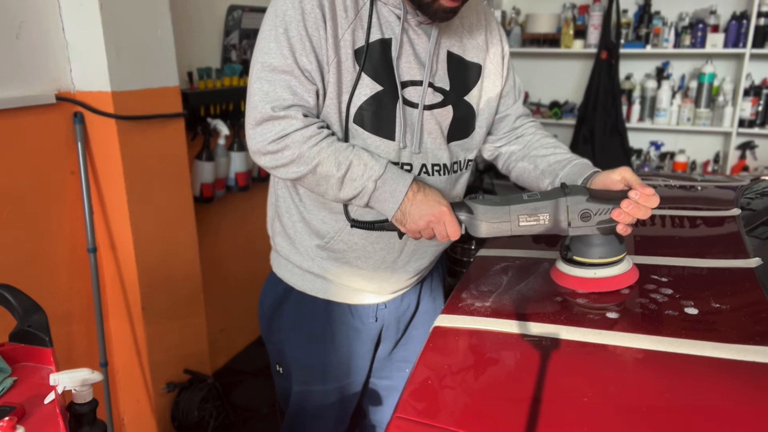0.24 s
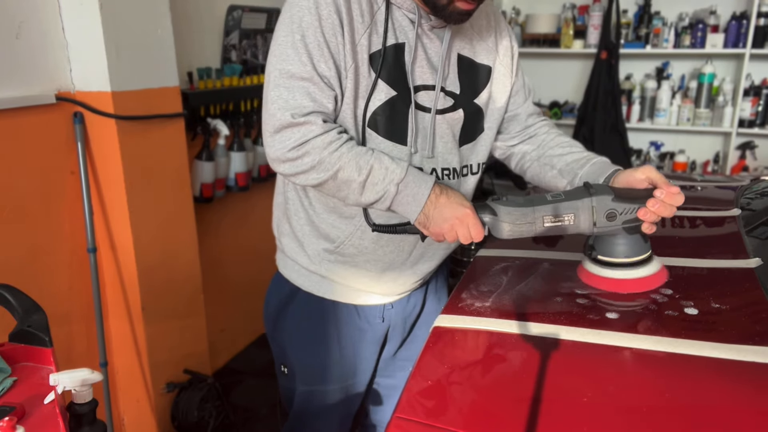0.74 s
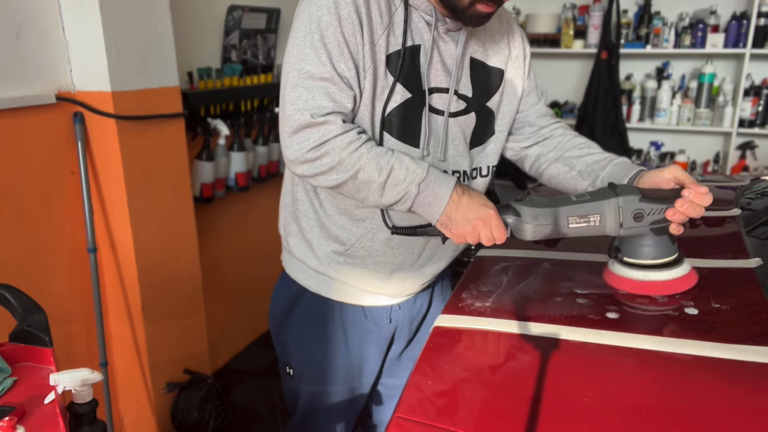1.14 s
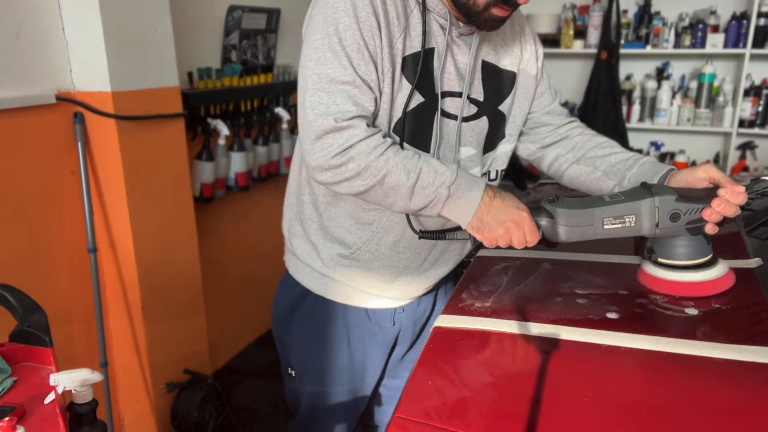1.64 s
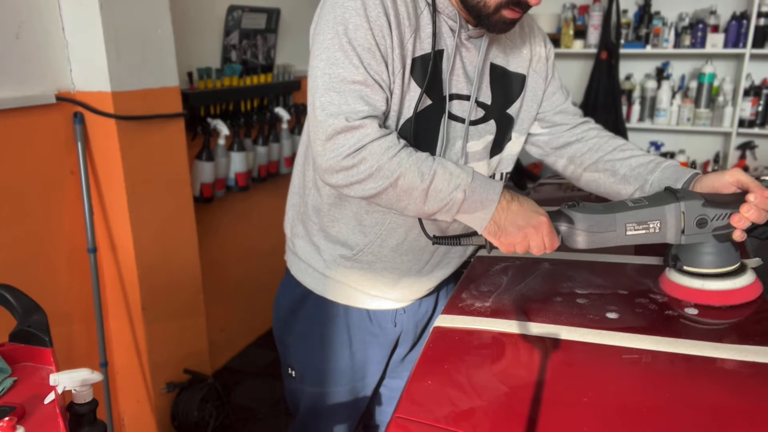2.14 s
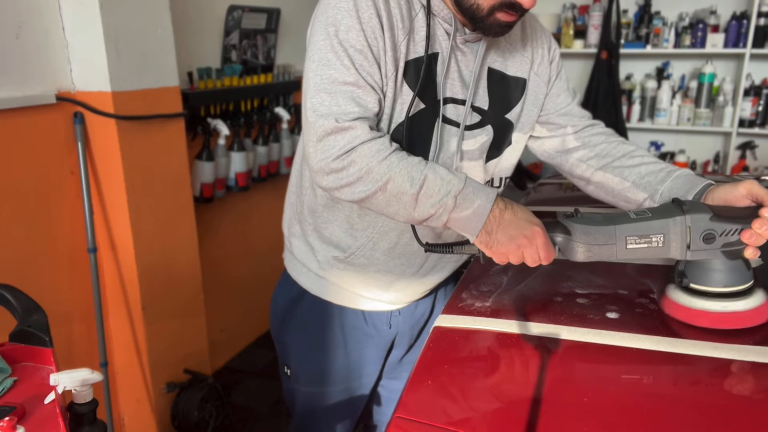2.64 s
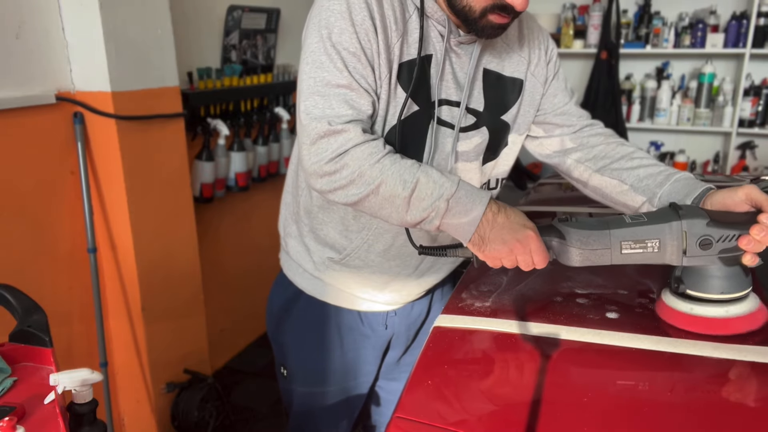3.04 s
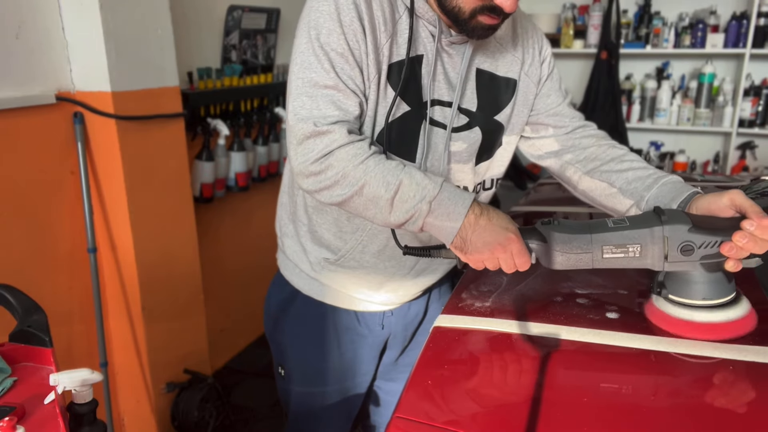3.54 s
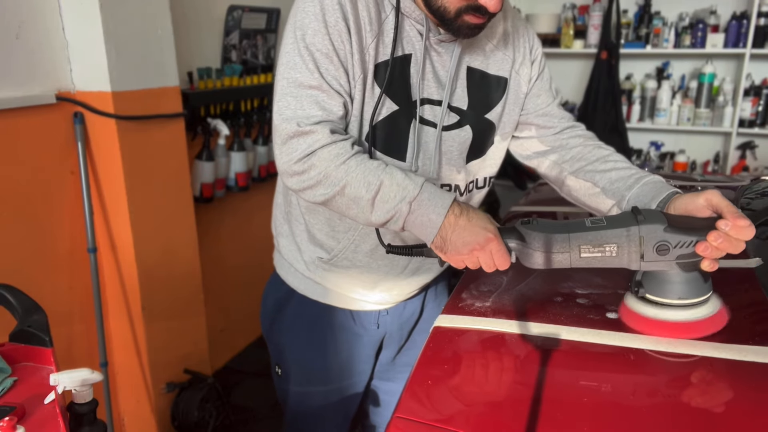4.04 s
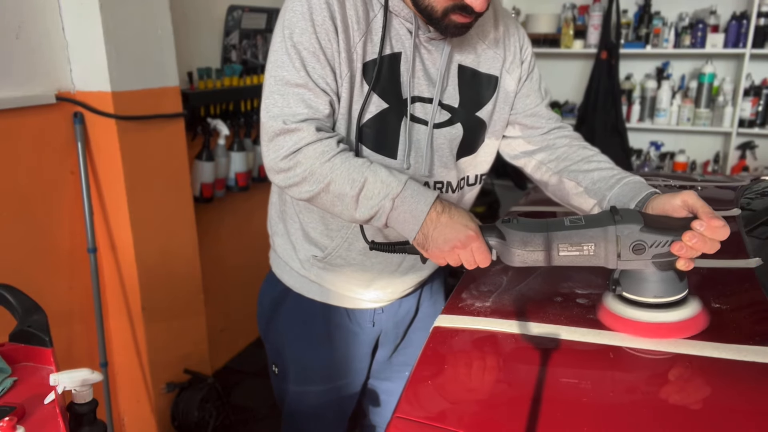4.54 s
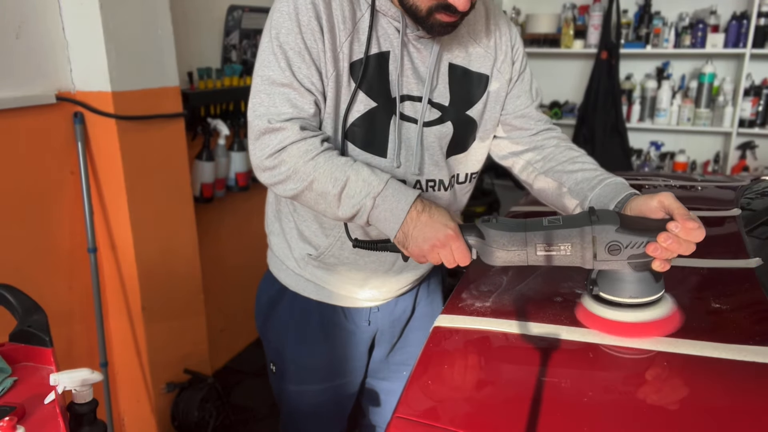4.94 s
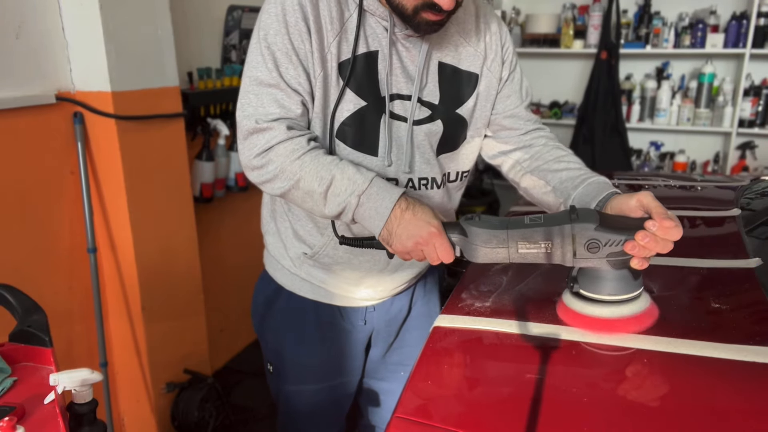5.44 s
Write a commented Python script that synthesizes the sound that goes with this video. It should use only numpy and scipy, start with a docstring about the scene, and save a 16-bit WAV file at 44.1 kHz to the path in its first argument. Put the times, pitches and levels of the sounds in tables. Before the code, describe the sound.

In a small workshop, close to a stereo microphone, an electric polisher sits almost silent, then starts with a surging hum, thumps and gear clatter. It settles into a coarse, buzzing rattle with foam scuffing over painted metal, then rises through four quicker steps, gaining hiss and whine, and is speeding up again as it ends.

```python
"""Polishing a car bonnet

In a small workshop, a dual-action polisher works close to a microphone with two ports, left and right.
Its motor hums with the mains pulses, starts, and climbs through four further speed steps.
Pulses of current knock the gears a hundred times a second, the orbiting pad shakes and scuffs the panel,
the commutator whines and air hisses from the vents; a short room tail surrounds it all."""
import sys
import numpy as np
from scipy import signal
from scipy.fft import rfft, irfft, next_fast_len
from scipy.io import wavfile
from scipy.ndimage import uniform_filter1d, map_coordinates

SR = 44100
rng = np.random.default_rng(int(sys.argv[2]) if len(sys.argv) > 2 else 0)


def log_audio(samples):
    """Write samples as a 16-bit WAV file to the path given in sys.argv[1]."""
    # one column per channel
    frames = np.atleast_2d(samples).T
    # limit to full scale, then quantise
    limited = np.clip(frames, -1, 1)
    pcm = np.round(limited * 32767).astype(np.int16)
    wavfile.write(sys.argv[1], SR, pcm)


N = 250929

PULSE_HZ = 100  # current pulses from the mains
GEAR_RATIO = 4.1  # rotor turns in one orbit of the pad
BARS = 24  # copper bars on the commutator
EDGE_HZ = 15500  # upper limit of the recorder
REFERENCE_SPEED = 100  # rotor turns per second
OVERSHOOT_AT_S, OVERSHOOT_S, OVERSHOOT_SHARE = 0.75, 0.18, 0.2  # centre, half length, share of the speed

# glides of the motor to each dial setting: (start [s], glide [s], rotor speed [turns/s])
DIAL = [(0.22, 0.48, 65.2), (2.19, 0.35, 83.9), (2.9, 0.37, 104.2), (3.97, 0.38, 124.3), (5.39, 0.5, 149)]
# resonances of the motor shell: (frequency [Hz], width [Hz], level [dB])
SHELL = [(3120, 250, -14), (3700, 260, -3), (5550, 600, -1), (6100, 400, 1), (6650, 600, 2)]


def dial_speed():
    """The speed asked of the motor, in turns per second: an eased glide to each setting."""
    t, speed = np.arange(N) / SR, np.zeros(N)
    for start, glide, setting in DIAL:
        progress = np.clip((t - start) / glide, 0, 1)
        speed = speed + (setting - speed) * np.sin(np.pi / 2 * progress) ** 2
    return speed


def rotor_speed(dial, sway=0.0033):
    """The rotor follows the dial with one overshoot, and sways a little as the pad drags."""
    overshoot = 1 + OVERSHOOT_SHARE * bump(OVERSHOOT_AT_S, OVERSHOOT_S)
    return dial * overshoot * (1 + sway * drift(7.2))


def straining():
    """How hard the motor works to reach a new speed: a rise and fall at the overshoot and every later glide."""
    steps = sum(bump(start + glide / 2, glide / 2) for start, glide, _ in DIAL[1:])
    return steps + bump(OVERSHOOT_AT_S, OVERSHOOT_S)


def hum(speed, waver=0.049, flutter=0.42):
    """The chopped mains current shakes the motor iron at multiples of the pulse rate."""
    # one partial for each multiple of the pulse rate: relative level [dB]
    partials_db = [-8.5, 2.5, -6.5, -9, -15, -31, -6, -43]
    # growth with speed: (level at rest [dB], running level at the reference speed [dB], step per doubling [dB])
    law = (-46.5, -42, 21.4)
    # dips and surges of the starting current: (centre [s], half length [s], change of hum [dB])
    surges = [(0.184, 0.045, -10), (0.269, 0.011, 6), (0.34, .04, -2), (.56, 0.3, 10)]
    turns = PULSE_HZ * np.arange(N) / SR + waver * .5 * drift(33.0)
    tone = np.zeros(N)
    for k, db in enumerate(partials_db, 1):
        loudness = amp(db) * (1 + flutter * drift(11.3))
        tone = tone + loudness * np.cos(2 * np.pi * (k * turns + rng.random()))
    starting_db = sum(db * bump(s, half) for s, half, db in surges)
    return played(tone, level(law, speed) + starting_db)


def knocks(turns, orbit, speed, delay_s=0.0022, play_s=0.00075, scatter_s=0.00028, contact_s=.0037,
           lengthen=0.51, rebound=0.52, rebound_s=0.0018):
    """Each current pulse throws the gears across their play: tooth pressure, its contacts looser with speed."""
    # hard clacks: (time [s], level over an ordinary knock [dB])
    clacks = [(.322, 6), (.443, 3), (0.535, 7), (0.605, 8), (0.623, 1), (0.694, 3), (0.893, 9),
              (1.043, 2.5), (1.152, 4.5), (1.381, 4), (1.444, 5), (1.481, 7), (1.821, 2), (2.111, 3.5),
              (2.392, 5), (2.482, 5), (2.681, 7), (2.81, 0), (3.06, 3), (3.154, 6), (3.25, 4), (3.551, 5.5),
              (3.563, 4), (4.021, 3), (4.393, 1.5), (4.402, 3), (4.56, 7), (5.052, 9), (5.091, 8),
              (5.221, 6), (5.681, 9)]
    s = np.arange(int(N / SR * PULSE_HZ)) / PULSE_HZ
    at = (s * SR).astype(int)
    late, strong, bouncy = rng.standard_normal((3, len(s)))
    pace = np.maximum(speed[at] / 65, 1)
    swing = np.sin(2 * np.pi * orbit[at]) + np.sin(4 * np.pi * orbit[at])
    s = s + delay_s + play_s * swing + scatter_s * pace * late
    uneven_db, rotor_db, orbit_db = .9, 1.1, 1.0
    db = uneven_db * np.tanh(strong)
    db = db + rotor_db * np.cos(2 * np.pi * turns[at]) + orbit_db * np.cos(2 * np.pi * orbit[at])
    for clack_s, extra_db in clacks:
        nearest = np.argmin(abs(s - clack_s))
        s[nearest], db[nearest], bouncy[nearest] = clack_s, extra_db, 0
    # the teeth slide into and out of contact; some blows split into a strike and a rebound
    pressure = np.zeros(N)
    lengths_s = contact_s * pace ** lengthen
    for blow_s, gain, length_s, split in zip(s, amp(db), lengths_s, bouncy > rebound):
        touches = [(blow_s, length_s)]
        if split:
            touches = [(blow_s + shift * rebound_s / 2, length_s / 2) for shift in (-1, 1)]
        for centre_s, touch_s in touches:
            add(pressure, centre_s - touch_s / 2, gain * signal.windows.hann(round(touch_s * SR)))
    return evened(pressure)


def gears(pressure, turns, speed, head_db=-2.5, mesh=0.05, chirp_hz=4280, spread_hz=430, scrape_share=0.15):
    """Knocks and a rub in every rotor turn ring the teeth, the housing and the gear head; the rub gains with speed."""
    # gear levels: (time [s], tooth knock [dB], housing chatter [dB])
    gear_levels = [(0, -85, -82), (.24, -69, -73), (.34, -59.5, -58), (.53, -49.5, -44.5),
                   (.61, -36.5, -45), (.92, -41, -48), (1.15, -36.5, -47), (1.55, -36.5, -48),
                   (2.15, -38, -44), (2.3, -39, -42), (3.3, -40.5, -39), (3.9, -43, -39.5),
                   (4.4, -37.5, -34), (4.75, -38.5, -36), (5.69, -38, -32.5)]
    # teeth under light load, on starting and at top speed: (frequency [Hz], width [Hz], level [dB])
    free_teeth = [(3060, 400, 7), (3740, 480, 9.5), (4500, 350, -8), (5120, 460, 11.5), (5540, 210, -10)]
    # teeth under load: (frequency [Hz], width [Hz], level [dB])
    loaded_teeth = [(3040, 684, 9.5), (3897, 510, 5), (4504, 370, 5.5), (5030, 1020, 3.5)]
    # plastic housing: (frequency [Hz], width [Hz], level [dB])
    housing = [(1714, 355, -6), (2160, 102, 12), (2420, 117, 11), (2608, 138, 12), (2950, 255, 12),
               (3824, 580, 6), (5030, 133, 8.5)]
    # upper ring of the gear head: (frequency [Hz], width [Hz], level [dB])
    gear_head = [(5710, 810, -8), (6600, 470, -2), (7290, 240, -8.5), (8310, 1700, -14)]
    loaded_at_s, loading_s = 0.89, .2  # the teeth take up the load of the pad
    fast = speed / 125
    knock_db, chatter_db = follow(gear_levels)

    # pressed teeth chirp briefly near their own pitch and scrape over a wide band
    chirp_turns = np.cumsum(chirp_hz + spread_hz * drift(895.0)) / SR
    chirp = np.sqrt(2) * pressure * np.cos(2 * np.pi * chirp_turns)
    rub_share, rub_depth = .55, 1.5
    rub = rub_share * np.minimum(fast, 1) ** 5 * evened(swell(turns, rub_depth))
    scrape = (pressure + rub + 0.019) * np.sign(rng.standard_normal(N))
    whirr = surface(turns + .008 * drift(25), count=110) * swell(PULSE_HZ * np.arange(N) / SR, .5)
    drive = scrape + mesh * fast ** 3 * whirr
    bite = chirp * np.clip(1.6 - 1.53 * fast, .2, 2)

    # loaded and free teeth blend with the pressure of the pad and the speed
    loaded = np.clip((np.arange(N) / SR - loaded_at_s) / loading_s, 0, 1)
    loaded = loaded * np.interp(speed, [105, 124], [1, .2])
    teeth = np.zeros(N)
    for modes, share in [(free_teeth, 1 - loaded), (loaded_teeth, loaded)]:
        teeth = teeth + share * (evened(ring(bite, modes)) + scrape_share * evened(ring(drive, modes)))
    # the upper ring comes in above the lowest speed step
    hard_db = np.interp(speed, [60.4, 96.0, 106.7, 121], [-3.5, 8.0, 4.0, -1.0])
    return (played(teeth, knock_db)
            + played(ring(drive, housing), chatter_db)
            + played(ring(drive, gear_head), chatter_db + head_db + hard_db))


def cover_buzz(pressure):
    """Now and then a loose cover shakes free and rings briefly with every knock."""
    # spells of buzzing: (centre [s], half length [s], peak level [dB])
    buzzes = [(3.073, 0.042, -42), (3.288, 0.18, -37.5), (3.58, 0.075, -39), (3.8, 0.12, -38.5),
              (4.054, 0.051, -37), (5.603, 0.098, -35)]
    cover_hz, cover_width_hz = 2995, 320
    waver = .115 * drift(75)
    shaking = sum(amp(db) * bump(s, half) for s, half, db in buzzes)
    rattle = pressure * np.cos(2 * np.pi * (cover_hz * np.arange(N) / SR + waver))
    return evened(ring(rattle, [(cover_hz, cover_width_hz, 0)])) * shaking


def pad(orbit, speed, grip=0.43):
    """The pad drums on the sheet metal and scuffs the paint once an orbit; its level shifts when it judders."""
    # the pad's bite changes for a moment:
    # (centre [s], half length [s], deep drumming [dB], higher drumming [dB], scuff [dB])
    judders = [(0.637, 0.15, 13.5, 4, 5), (1.15, 0.097, 8, 7, 2), (2.454, 0.081, 5.5, 3, 5),
               (2.768, 0.011, 3, 9, 3), (3.065, 0.14, -3.5, 2.5, 3.5), (4.235, 0.4, -1, 2.5, 1),
               (5.654, 0.23, 1.5, -4, 2)]
    # deep drumming of the sheet metal: (frequency [Hz], width [Hz], level [dB])
    deep_sheet = [(127, 44, -0.5), (165.2, 11, 6)]
    # higher drumming of the sheet metal: (frequency [Hz], width [Hz], level [dB])
    high_sheet = [(235, 37, 0.5), (246, 69, 0), (294, 36, -1), (363, 147, -6), (440, 140, -15.5)]
    # foam rubbing on the paint: (frequency [Hz], width [Hz], level [dB])
    foam = [(560, 380, -9), (700, 220, -4), (900, 200, -8.5), (1120, 220, -12), (1600, 1100, -14)]
    # growth with speed, deep, higher and scuff:
    # (level at rest [dB], running level at the reference speed [dB], step per doubling [dB])
    deep_law = (-66, -39.5, 7.5)
    high_law = (-60.5, -38, 9.4)
    scuff_law = (-51.5, -38, 12.1)
    deep_db, high_db, scuff_db = sum(np.outer(extra_db, bump(s, half)) for s, half, *extra_db in judders)
    # the slower the orbit, the more the foam sticks and slips
    stick = np.clip(1.5 - speed / 110, 0, 1)
    drumming = np.zeros(N)
    for modes, law, judder_db in [(deep_sheet, deep_law, deep_db), (high_sheet, high_law, high_db)]:
        rub = evened(ring(rng.standard_normal(N) * swell(orbit, stick), modes))
        profile = surface(orbit + 0.0052 * drift(24.0), count=40)
        drum = evened(ring(profile, modes)) * np.clip(speed / 60, 0, 1)
        drumming = drumming + played((1 - grip) * rub + grip * drum, level(law, speed) + judder_db, size=4500)
    slip = rng.standard_normal(N) * swell(orbit, .5 * stick) * amp(1.0 * drift(41))
    return drumming + played(ring(slip, foam), level(scuff_law, speed) + scuff_db)


def catches(orbit, speed, length_s=0.013):
    """In a few spells at low speed the foam grabs the paint once an orbit and lets go with a short squeak."""
    # spells of catching: (strongest catch [s], half length [s], peak level [dB])
    spells = [(0.322, 0.012, -53), (0.474, 0.02, -44), (0.549, 0.027, -32), (0.945, 0.024, -43.5),
              (1.616, 0.28, -33)]
    # squeak of the foam: (frequency [Hz], width [Hz], level [dB])
    squeak = [(847, 150, 15.5), (950, 2800, -3.5)]
    orbit_s, grabs = GEAR_RATIO / (speed + 1), np.zeros(N)
    for s, half, db in spells:
        from_grab_s = ((orbit - orbit[int(s * SR)] + .5) % 1 - .5) * orbit_s
        grabs = grabs + amp(db) * bump(s, half) * np.exp(-(from_grab_s / length_s) ** 2)
    return grabs * played(ring(rng.standard_normal(N), squeak), 0, size=600)


def pressed(settle_at_s=0.28, settle_s=.85):
    """How firmly the pad bears on the bonnet, 0 to 1."""
    return np.clip((np.arange(N) / SR - settle_at_s) / settle_s, 0, 1)


def throb(orbit, speed, level_db=-34, doubling_db=7, wallow=0.2, resting=0.11):
    """The eccentric pad rocks the bonnet, most when a multiple of the orbit rate meets its bending resonance."""
    # bending of the whole bonnet: (frequency [Hz], width [Hz], level [dB])
    bonnet = [(48, 6.9, -6), (68.3, 20, -18), (24.8, 2.2, -22)]
    rocking = surface(orbit + 0.023 * drift(42), count=8) + wallow * rng.standard_normal(N)
    force = amp(doubling_db * np.log2(speed / REFERENCE_SPEED + 1e-6)) * pressed()
    shaking = rocking * force + resting * rng.standard_normal(N)
    return amp(level_db) * evened(ring(shaking, bonnet))


def booms(waver=0.12):
    """Slack sheet metal under the pad swells into a low note and dies away."""
    # booms: (centre [s], half length [s], frequency [Hz], peak level [dB])
    slack_notes = [(0.616, 0.026, 118, -25.5), (3.264, 0.14, 72.3, -37), (3.55, 0.17, 94, -35.5),
                   (4.276, 0.13, 41.5, -26.5), (4.28, 0.24, 82.8, -35), (5.69, 0.057, 65.5, -34)]
    t = np.arange(N) / SR
    return sum(amp(db) * bump(s, half) * np.sin(2 * np.pi * (hz * t + waver * drift(12)))
               for s, half, hz, db in slack_notes)


def thumps(length_s=0.0076):
    """Each hop of the pad gives the bonnet a short, smooth thump."""
    # hops of the pad: (centre [s], frequency [Hz], peak level [dB])
    hops = [(0.634, 119, -27), (0.662, 180, -24.5), (2.372, 270, -32), (2.425, 227, -21.5),
            (2.479, 232, -22), (2.526, 245, -25), (2.576, 245, -29)]
    t = np.arange(N) / SR
    return sum(amp(db) * bump(s, length_s) * np.cos(2 * np.pi * (hz * (t - s) + rng.random()))
               for s, hz, db in hops)


def commutator(turns, speed, gain_db=-37, lopsided=0.66, spark=1.0, straining_db=-1.0):
    """Brushes tick over the copper bars; the rotor runs slightly out of true, so the whine throbs once a turn."""
    # ring of the brush holders: (frequency [Hz], width [Hz], level [dB])
    holders = [(3695, 620, 8.5), (8700, 1300, -7), (10900, 1200, -11), (11950, 1000, 2), (13200, 1200, -5)]
    runout, flutter, sway = .0014, .0016, .0026  # turns
    tone_db = -42.5
    angle = turns + runout * np.sin(2 * np.pi * turns) + flutter * drift(310)
    # each harmonic stops at the recorder's limit
    bars = sum(np.cos(2 * np.pi * BARS * k * angle) * (BARS * k * speed < EDGE_HZ) for k in (2, 4, 5, 6, 7, 8))
    ticking = (bars + spark * rng.standard_normal(N)) * evened(swell(turns, lopsided))
    whine = ring(ticking, holders) * amp(gain_db) * (speed / 125) ** 3.64
    # the upper sideband of the second bar harmonic sings out when it glides through a shell resonance
    tone = np.cos(2 * np.pi * (2 * BARS + 1) * (turns + sway * drift(54)))
    return (whine + ring(tone, SHELL) * amp(tone_db)) * amp(straining_db * straining())


def head_whine(turns, speed, gain_db=-42):
    """The third bar harmonic rasps in the shell during speed changes and sings from the vents at high speed."""
    tone = np.cos(2 * np.pi * 3 * BARS * (turns + .0031 * drift(170)))
    vents = amp(-54 + 3 * straining()) * (speed / 125) ** 5
    return ring(tone, SHELL) * amp(gain_db) * straining() + tone * vents


def strain_whine(turns):
    """The upper sideband of the second bar harmonic stands out briefly as the motor pulls up to a higher speed."""
    # the motor sings: (centre [s], half length [s], peak level [dB])
    pulls = [(2.4, .065, -39.5), (5.59, .07, -46)]
    tone = np.cos(2 * np.pi * (2 * BARS + 1) * (turns + .0024 * drift(100)))
    return tone * sum(amp(db) * bump(s, half) for s, half, db in pulls)


def fan(turns, speed, pulsing=0.1):
    """Cooling air hisses from the vents, pulsing with each turn."""
    # spectrum of the hiss: (frequency [Hz], relative level per hertz [dB])
    air = [(20, 3), (1000, 10), (3000, 11.5), (6000, 4), (7900, -1.5), (9200, 7.5), (10200, 1),
           (11500, 1.5), (13000, 1), (14000, 5), (14800, -21)]
    # growth with speed: (level at rest [dB], running level at the reference speed [dB], step per doubling [dB])
    law = (-58, -41.5, 8.5)
    hz = np.fft.rfftfreq(N, 1 / SR)
    hiss = irfft(rfft(rng.standard_normal(N)) * amp(read(air, hz)), N)
    return evened(hiss * swell(turns, pulsing)) * amp(level(law, speed) + 1.7 * drift(95))


def iron_buzz(level_db=-64, depth=1.0):
    """The current pulses fizz faintly in the motor iron, even at rest."""
    # ring of the motor iron: (frequency [Hz], width [Hz], level [dB])
    iron = [(2300, 68, 19), (3740, 240, -1), (4960, 420, -28), (6600, 700, 0), (7600, 900, 3)]
    fizz = rng.standard_normal(N) * swell(PULSE_HZ * np.arange(N) / SR, depth)
    return evened(ring(fizz, iron)) * amp(level_db)


def workshop(x, t60=0.15, first_s=0.0037, change_hz=1.289, count=3):
    """The direct sound meets the two ports at a slant; short room tails blend and change over time."""
    # phase between the microphone ports: (frequency [Hz], lead of the left [rad])
    port_phase = [(60, 0), (250, -.35), (600, -1.2), (1120, -1.0), (1460, -2.6), (2000, -3.14),
                  (2930, -4.8), (4130, -6.0), (5680, -9.0), (6100, -7.0), (6600, -9.9), (7900, -9.42),
                  (9200, -8.5), (10600, -6.4), (12000, -5.2), (13000, -6.0), (15000, -3.8)]
    # balance of the ports: (frequency [Hz], left minus right [dB])
    balance = [(50, 0.5), (170, 2), (330, 2), (700, -4.5), (1300, -2.5), (2200, 0.5), (3000, -1),
               (4000, -1.5), (5500, -2.5), (7000, -1), (12000, 0)]
    # reverberation: (frequency [Hz], level against the direct sound [dB])
    wet_levels = [(40, -19), (200, -10), (700, -7), (1300, -3), (2100, -13), (3400, -6), (5000, -6),
                  (8000, -8), (10000, -6), (11500, -16), (15000, -9)]
    size = next_fast_len(N + SR // 2)
    hz, t = np.fft.rfftfreq(size, 1 / SR), np.arange(SR // 3) / SR
    side, wet, room = np.array([[.5], [-.5]]), amp(read(wet_levels, hz)), 0
    for k in range(count):
        tails = rng.standard_normal((2, len(t))) * amp(-60 * t / t60) * (t > first_s)
        tails = tails / np.linalg.norm(tails, axis=1, keepdims=True)
        share = np.sqrt(2 / count) * np.cos(np.pi * (change_hz * np.arange(N) / SR + k / count))
        room = room + rfft(x * share, size) * rfft(tails, size)
    direct = rfft(x, size) * np.exp(1j * side * read(port_phase, hz))
    both = (direct + wet * room) / np.sqrt(1 + wet ** 2)
    return irfft(both * amp(side * read(balance, hz)), size)[:, :N]


def travel(ports):
    """The gap in arrival time between the ports follows the polisher's place, below the high treble."""
    # travel across the bonnet: (time [s], extra delay at the left port [ms])
    path = [(0, -0.061), (.6, -0.038), (1.3, -0.021), (2, -0.0062), (3.3, 0.02), (4.4, -0.0059),
            (5.69, -0.029)]
    delay_ms, = follow(path)
    half = delay_ms * SR / 1000 / 2  # samples, shared between the ports
    body = signal.sosfiltfilt(signal.butter(4, 5000, fs=SR, output="sos"), ports)
    moved = [map_coordinates(x, [np.arange(N) - sign * half], order=3, mode="nearest")
             for x, sign in zip(body, (1, -1))]
    return ports - body + np.array(moved)


def amp(db):
    """Decibels as a factor of amplitude."""
    return 10 ** (np.asarray(db) / 20)


def evened(x):
    """Scales x to unit effective level."""
    return x / np.sqrt(np.mean(x ** 2) + 1e-20)


def read(points, hz):
    """A spectrum on a logarithmic frequency axis."""
    f, value = np.transpose(points)
    return np.interp(np.log(hz + 1), np.log(f + 1), value)


def follow(table):
    """The columns of a table over time, joined by straight lines."""
    s, *columns = np.transpose(table)
    return [np.interp(np.arange(N) / SR, s, column) for column in columns]


def drift(rate_hz):
    """Smooth random wander of unit size, mostly slower than the given rate."""
    hz = np.fft.rfftfreq(N, 1 / SR)
    return evened(irfft(rfft(rng.standard_normal(N)) * np.exp(-(hz / rate_hz) ** 2), N))


def bump(centre_s, half_s):
    """A smooth rise to 1 and fall around a moment."""
    return np.exp(-((np.arange(N) / SR - centre_s) / half_s) ** 2)


def swell(turns, depth):
    """A gain that peaks once in every turn."""
    return np.exp(depth * np.cos(2 * np.pi * turns))


def surface(turns, count):
    """A random profile that comes round again on every turn: count harmonics of equal height."""
    size = 16 * count
    profile = irfft(np.r_[0, np.exp(2j * np.pi * rng.random(count))], size)
    return evened(np.interp(turns, np.arange(size) / size, profile, period=1))


def ring(x, modes):
    """Passes x through a body with these resonances, causally."""
    size = 2 * next_fast_len(N // 2 + SR // 4)
    hz = np.fft.rfftfreq(size, 1 / SR)
    power = sum(amp(db) ** 2 / (1 + (2 * (hz - f) / width) ** 2) ** 2 for f, width, db in modes)
    # folding the cepstrum gives the minimum-phase response
    cepstrum = irfft(np.log(power + 1e-12))[:size // 2]
    cepstrum[0] /= 2
    return irfft(rfft(x, size) * np.exp(rfft(cepstrum, size)))[:N]


def level(law, speed):
    """The level in dB of a sound that grows by a fixed step per doubling of speed, above a resting floor."""
    rest_db, running_db, doubling_db = law
    running = amp(running_db + doubling_db * np.log2(speed / REFERENCE_SPEED + 1e-6))
    return 20 * np.log10(np.hypot(amp(rest_db), running))


def played(x, level_db, size=6000):
    """Makes the running level of x follow a curve; size is the averaging length in samples."""
    power = uniform_filter1d(uniform_filter1d(x ** 2, size), size // 2)
    return x * amp(level_db) / np.sqrt(np.abs(power) + 1e-12)


def add(mix, s, sound):
    """Adds a sound to the mix at a moment."""
    part = mix[max(round(s * SR), 0):][:len(sound)]
    part += sound[:len(part)]


def scene():
    """One rotor drives the gears, fan and whine; the pad orbits at a fraction of its speed."""
    speed = rotor_speed(dial_speed())
    turns = np.cumsum(speed) / SR
    orbit = turns / GEAR_RATIO
    pressure = knocks(turns, orbit, speed)
    whines = commutator(turns, speed) + head_whine(turns, speed) + strain_whine(turns)
    motor = hum(speed) + iron_buzz() + whines + fan(turns, speed)
    rattle = gears(pressure, turns, speed) + cover_buzz(pressure)
    panel = throb(orbit, speed) + booms() + thumps() + pad(orbit, speed) + catches(orbit, speed)
    return travel(workshop(motor + rattle + panel))


def record(dry):
    """The recorder's band limit."""
    lowpass = signal.firwin(401, EDGE_HZ, window=("kaiser", 9), fs=SR)
    return signal.oaconvolve(dry, lowpass[None], "same")


dry = scene()
out = record(dry)
log_audio(out)
```